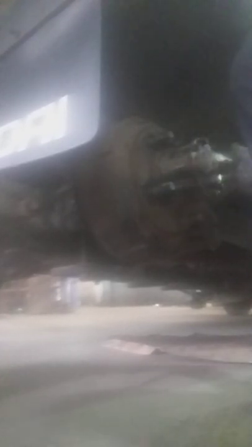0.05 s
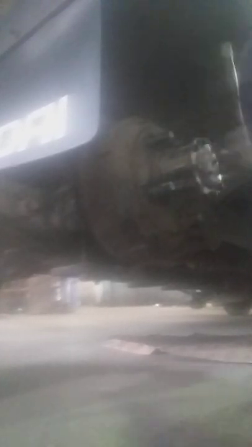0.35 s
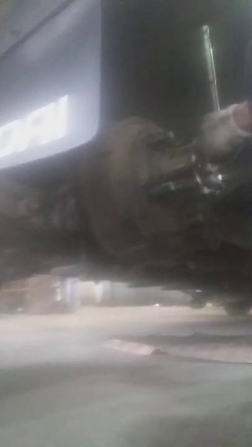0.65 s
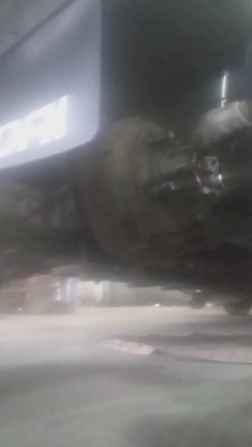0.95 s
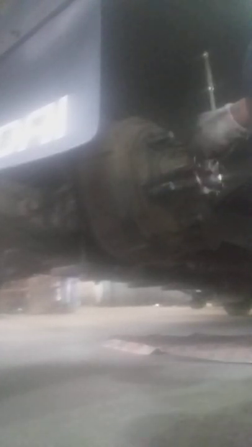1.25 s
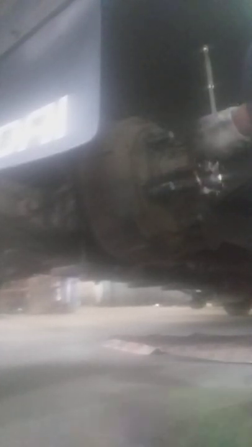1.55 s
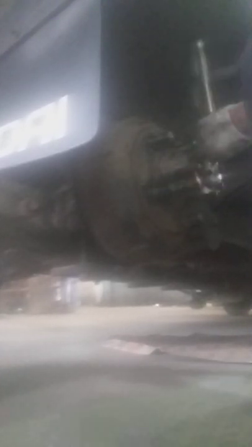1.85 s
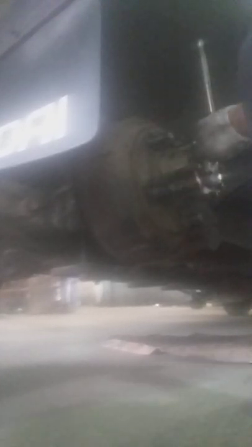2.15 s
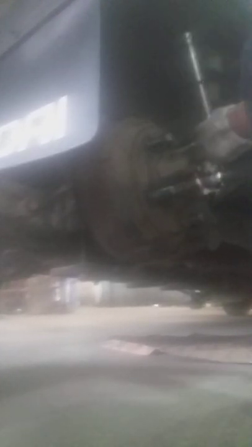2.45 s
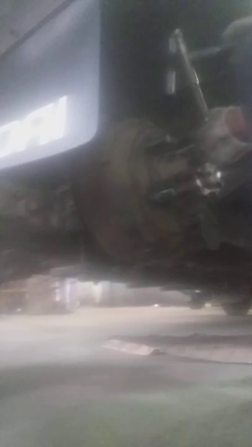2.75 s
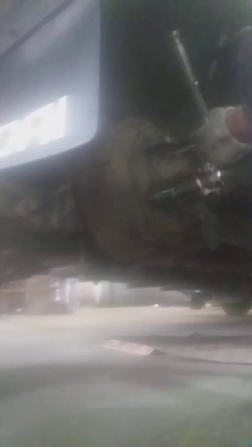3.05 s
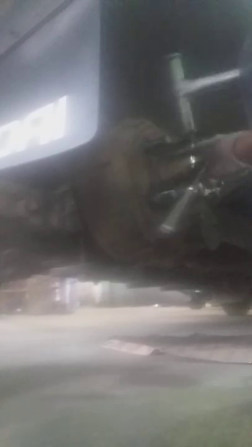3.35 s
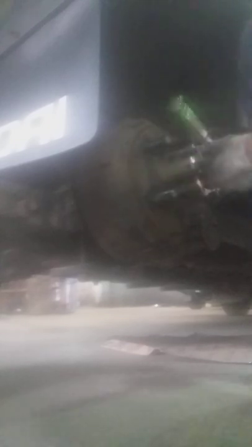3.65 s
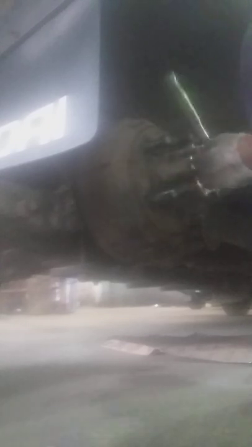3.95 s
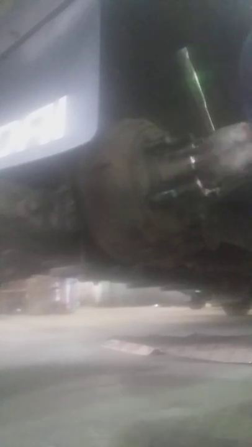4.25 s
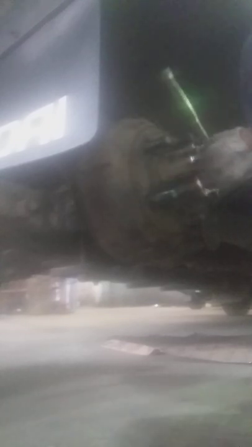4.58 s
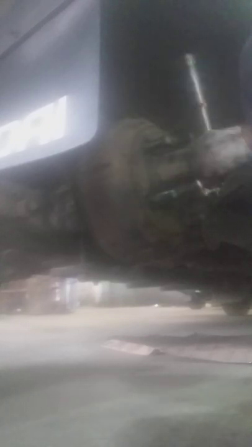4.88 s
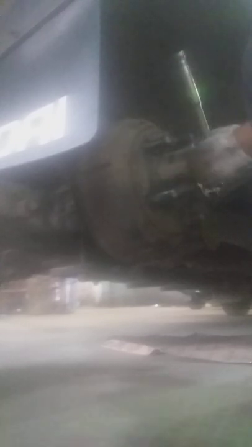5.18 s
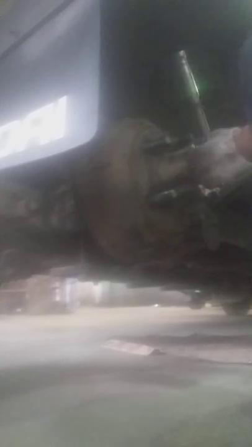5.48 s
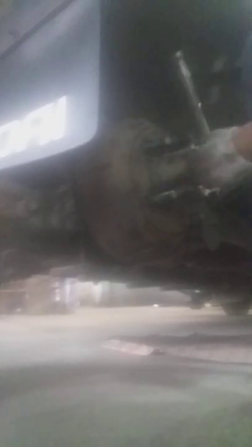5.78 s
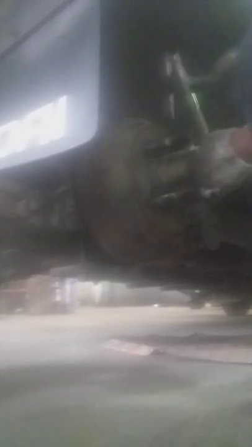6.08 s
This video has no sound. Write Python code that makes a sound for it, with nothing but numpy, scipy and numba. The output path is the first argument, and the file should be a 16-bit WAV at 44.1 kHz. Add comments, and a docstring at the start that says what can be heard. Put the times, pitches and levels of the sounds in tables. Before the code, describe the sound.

A hammer strikes steel four times, pauses for small metal clinks, then strikes twice more, over a workshop's fan and motor hum.

```python
"""A reverberant workshop, with a phone microphone close to a wheel hub.
Six hard hammer blows land on a steel drift held against the hub: the steel rings, the suspension thuds.
The drift clinks as it is set in place; further off an electric motor whines and a fan rushes.
Each blow overloads the phone, whose gain control sinks, holds, and lets the shop swell back in the
pauses."""
import sys
import numpy as np
from scipy import signal
from scipy.fft import rfft, irfft
from scipy.io import wavfile
from scipy.ndimage import uniform_filter1d
from numba import njit

SR = 44100
rng = np.random.default_rng(int(sys.argv[2]) if len(sys.argv) > 2 else 0)


def inscribe(sig):
    """Save sig as 16-bit PCM at rate SR to the path in sys.argv[1].

    A 1-D sig is mono; a 2-D sig holds one channel per row.
    Samples are clipped to [-1, 1] before scaling.
    """
    pcm = np.round(np.clip(np.atleast_2d(sig).T, -1, 1) * 32767)
    wavfile.write(sys.argv[1], SR, pcm.astype(np.int16))


N = 274302
TIME = np.arange(N) / SR
AGE = np.arange(SR) / SR  # the second after a contact


def undb(db):
    """Decibels to gain."""
    return 10 ** (np.asarray(db) / 20)


def add(track, s, sound):
    """Mix a sound into a track at time s."""
    i = int(s * SR)
    track[i:i + len(sound)] += sound[:N - i]


def noise(spectrum, size, tilt_db=0):
    """Noise of rms 1 with a (f/Hz, level/dB) spectrum, tilted in dB per octave."""
    octave = np.log2(np.fft.rfftfreq(size, 1 / SR) + 1)
    hz, db = np.transpose(spectrum)
    gain = undb(np.interp(octave, np.log2(hz), db, left=-np.inf) + tilt_db * octave)
    x = irfft(rfft(rng.standard_normal(size)) * gain, size)
    return x / np.sqrt(np.mean(x ** 2))


def walk(rate):
    """Smooth random wander with a spread near 1, at rate steps a second."""
    k = int(SR / rate)
    steps = np.repeat(rng.standard_normal(N // k + 1), k)
    return 1.09 * uniform_filter1d(uniform_filter1d(steps, k), k)[:N]


def fade(t60):
    """Exponential decay, 60 dB down after t60 seconds."""
    return undb(-60 * AGE / max(t60, .005))


def ring(modes, smear_hz, tilt_db=0):
    """Decaying modes from rms 1; each contact excites them anew and chattering joints smear the pitch."""
    out, power = 0, 0
    for (hz, db, t60), (scatter, start) in zip(modes, rng.standard_normal((len(modes), 2))):
        gain = undb(db + 2 * scatter + tilt_db * np.log2(hz))
        chatter = np.cumsum(rng.standard_normal(SR)) * np.sqrt(2 * np.pi * smear_hz / SR)
        phase = 2 * np.pi * (hz * AGE + start) + uniform_filter1d(chatter, size=100)
        out = out + gain * fade(t60) * np.sin(phase)
        power += gain ** 2 / 2
    return out / np.sqrt(power)


# faint hiss at the very back: f/Hz, level/dB
HISS = [(9000, -15), (10300, -3), (11200, -16), (12300, 4.5), (12900, -13), (13700, -5), (14200, -9),
        (14700, -3.5), (15700, -14.5)]
# its course: t/s, level/dB
HISS_LEVEL = [(0, -58), (4.9, -67), (5.05, -52.5), (6.2, -54)]

def hiss():
    """A thin, high, flickering hiss, stronger towards the end."""
    return undb(np.interp(TIME, *np.transpose(HISS_LEVEL)) + 1.8 * walk(40)) * noise(HISS, N)


# fan and shop air, well off the microphone: f/Hz, level/dB
FAN_AIR = [(25, -19), (60, -10.5), (110, 0.5), (500, -6), (1000, -8.5), (2000, -14), (2450, -19.5),
           (2950, -4), (3400, -15), (4150, -12), (6800, -20), (8700, -28), (12300, -31.5), (16000, -35.5)]
# the fan's drone: f/Hz, level/dB
FAN_DRONE = [(55, -35.0), (70, -7.5), (77, 1.5), (84, -9), (105, -40.0), (400, -91.5)]

def fan():
    """A steady rush of air over a throbbing low drone."""
    rush = undb(-37.5 + 0.45 * walk(3.2)) * noise(FAN_AIR, N)
    drone = undb(-46) * noise(FAN_DRONE, N)
    return rush + drone


def shaft_tones(lines, turns, waver_db, waver_rate):
    """Tones on multiples of the shaft rate, wavering in level and phase on their way through the hall."""
    out = 0
    for multiple, db in lines:
        phase = 2 * np.pi * (multiple * turns + rng.random()) + .5 * walk(waver_rate)
        out = out + undb(db + waver_db * walk(waver_rate)) * np.sqrt(2) * np.sin(phase)
    return out


# motor hum and faint overtones, across the hall: multiple of the shaft rate, level/dB
MOTOR_HUM = [(2, -48), (4, -49), (35, -64), (72, -59), (75, -58), (95, -48), (96, -55), (101, -56),
             (155, -67), (164, -70), (167, -70)]
# rotor slot whine: multiple of the shaft rate, level/dB
ROTOR_SLOTS = [(45, -62), (48, -41), (49, -53), (51, -54), (52, -39), (53, -54)]
# swell of that whine at the microphone: t/s, level/dB
WHINE_SWELL = [(0, -19), (.85, -3.5), (1.1, -1.5), (1.22, 5), (1.35, -2), (1.48, 7.5), (1.7, -2.5),
               (4.3, -4.5), (4.53, -1), (4.75, -7), (5.3, -10.5), (6.2, -1)]

def motor(shaft_hz=59.01):
    """A distant induction motor: low hum, fluttering overtones and a slot whine that swells and fades."""
    turns = np.cumsum(shaft_hz * (1 + 0.0003 * walk(7.7) + 0.0015 * walk(60))) / SR
    whine = shaft_tones(ROTOR_SLOTS, turns, waver_db=1.8, waver_rate=26)
    hum = shaft_tones(MOTOR_HUM, turns, waver_db=2.6, waver_rate=32)
    return undb(np.interp(TIME, *np.transpose(WHINE_SWELL))) * whine + hum


# decay of the hall around the microphone: f/Hz, t60/s
HALL_DECAY = [(100, 0.87), (1000, 0.77), (2900, 1.325), (4100, 0.92), (6000, 0.55), (7200, 0.68),
              (12000, 0.38)]

def workshop(x):
    """Diffuse reverberation of the hall; the high treble dies first."""
    hz, t60 = np.transpose(HALL_DECAY)
    spectrum = rfft(rng.standard_normal(SR))
    f = np.fft.rfftfreq(SR, 1 / SR) + 1
    band = np.round(2 * np.log2(np.maximum(f, hz[0])))  # half octaves
    tail = 0
    for b in np.unique(band):
        band_t60 = np.interp(b / 2, np.log2(hz), t60)
        tail = tail + irfft(spectrum * (band == b), SR) * fade(band_t60)
    tail = tail * (1 - fade(t60=0.05))  # reflections build up
    return signal.fftconvolve(x, tail / np.sqrt(np.sum(tail ** 2)))[:N]


def between(slide, knock, sharpness):
    """Geometric blend of two times."""
    return slide ** (1 - sharpness) * knock ** sharpness


# the drift touching the hub, close by: t/s, level/dB, sharpness (0 sliding, 1 knocking)
DRIFT_TOUCHES = [(0.523, -30, 0.39), (0.5493, -24.5, 0.42), (0.8526, -33.5, 0.52), (1.0016, -36, 0.66),
                 (3.9251, -28, 0.16), (4.671, -33.5, 0.055), (4.837, -24.5, 0.66), (4.873, -17.5, 0.91),
                 (4.9164, -21.5, 0.8)]
# modes of the loose drift: f/Hz, level/dB, t60/s
LOOSE_DRIFT_MODES = [(2050, 6, 0.094), (3920, 7, 0.069), (4150, 11, 0.055), (4770, 4.5, 0.11),
                     (5520, 11, 0.036), (6020, 14.5, 0.085), (6100, 10, 0.044), (8440, 6, 0.058),
                     (11000, 1, 0.048)]
# steel scraping on steel: f/Hz, level/dB
STEEL_SCRAPE = [(200, -27), (1200, -4), (2100, -3), (4300, -1.5), (6400, 2.5), (7800, -14.5), (11000, -16),
                (16000, -10)]

def touches(slide_tilt_db=-6.5, knock_tilt_db=3.1):
    """The loosely held drift finds its seat: slides are slow and dull, knocks quick and bright."""
    out = np.zeros(N)
    for s, db, sharpness in DRIFT_TOUCHES:
        tilt_db = slide_tilt_db + sharpness * (knock_tilt_db - slide_tilt_db)
        scrape = noise(STEEL_SCRAPE, SR, tilt_db) * fade(t60=between(0.16, 0.059, sharpness))
        clink = undb(-1.0) * ring(LOOSE_DRIFT_MODES, smear_hz=50, tilt_db=tilt_db)
        rise_s = between(.005, .0003, sharpness)
        add(out, s, undb(db) * (scrape + clink) * (1 - np.exp(-AGE / rise_s)))
    return out


# the crowd of short modes in hub, brake and axle: f/Hz, level/dB
AXLE_CLASH = [(60, -24), (250, -17), (720, -7.5), (1050, -12.5), (1600, -18.5), (2000, -11), (2450, -14),
              (2850, 9.5), (3400, -2), (5200, -1.5), (7100, -0.5), (7900, -20.5), (9200, -23.5),
              (12000, -20), (16000, -26.5)]
# modes of the wheel hub, right at the microphone: f/Hz, level/dB, t60/s
HUB_MODES = [(2753, -3, .2), (2831, -2, .28), (2878, -5, .24), (2985, -4, .2), (3066, -3, .22),
             (3171, -10, .15), (3402, -14, .12), (3570, -15, .12), (3720, -9, .14), (3890, -8, .15),
             (3981, -7, .15), (4119, -5, .16), (4293, -8, .14), (4575, -8, .15), (4727, -4, .15),
             (5043, -10, .14), (5464, -10, .13), (5725, -7, .13), (5871, -9, .13), (6380, -7, .13),
             (6480, -6, .13), (7150, -12, .13), (11750, -17, .1), (12130, -19, .12)]
# modes of the struck drift: f/Hz, level/dB, t60/s
STRUCK_DRIFT_MODES = [(5228, 0, .14), (5205, -7, .1)]

def steel_ring(t60, tilt_db, hub_db, drift_db):
    """One contact of steel on steel: a dense clash, and the ring of hub and drift."""
    clash = noise(AXLE_CLASH, SR, tilt_db) * fade(t60)
    hub = undb(hub_db) * ring(HUB_MODES, smear_hz=22, tilt_db=tilt_db)
    drift = undb(drift_db) * ring(STRUCK_DRIFT_MODES, smear_hz=38)
    return clash + hub + drift


# thud of suspension and body, just behind the hub: f/Hz, level/dB
BODY_THUD = [(25, -26.5), (70, -6), (130, -1), (240, -10), (500, -22.5), (1000, -11), (2000, -17.5),
             (6000, -91)]
# modes of suspension arm and wheel arch: f/Hz, level/dB, t60/s
BODY_MODES = [(234.6, -0.5, 0.6), (342.4, 0, 0.21), (474.6, 1, 0.32), (695, -2.5, 0.227), (807, -10, 0.63),
              (962, 3, 0.26), (1095, -0.5, 0.36)]

def suspension():
    """A blow builds up in the suspension as a low thud with a hollow ring."""
    thud = noise(BODY_THUD, SR) * fade(t60=0.16)
    hollow = undb(-9.5) * ring(BODY_MODES, smear_hz=22)
    return (thud + hollow) * (1 - fade(t60=0.0068))


# steel meeting steel, close up: f/Hz, level/dB
STEEL_CRACK = [(40, -5), (200, -0.5), (1000, 1), (2200, -4.5), (3000, 5.5), (6500, 3.5), (8000, -16),
               (16000, -12)]

def crack(envelope, tilt_db=0):
    """The broadband burst at the instant of contact."""
    return noise(STEEL_CRACK, SR, tilt_db) * envelope


# the drift jumps off its seat and rattles on the hub after the fourth blow: t/s, level/dB
DRIFT_REBOUNDS = [(3.1641, 7), (3.1849, 4), (3.1995, 3.5), (3.211, 1.5)]

def rebounds():
    """The bouncing drift ticks and briefly rings the steel; it is too light to shake the suspension."""
    out = np.zeros(N)
    for s, db in DRIFT_REBOUNDS:
        tick = undb(-6.5) * crack(fade(t60=.014), tilt_db=5.5)
        steel = steel_ring(t60=0.048, tilt_db=2, hub_db=-6, drift_db=-1.5) * fade(t60=.2)
        add(out, s, undb(db) * (tick + steel))
    return out


# hammer blows, close to the microphone:
# t/s, level/dB, clash t60/s, hardness as tilt/(dB per octave), hub level/dB, drift level/dB
HAMMER_BLOWS = [(1.7044, 10.5, 0.18, -3.5, 3, -0.5), (2.2266, 15, 0.14, 0.5, -4.5, -2),
                (2.716, 13, 0.11, -0.5, -2, -9.5), (3.143, 12.5, 0.075, 0.5, -2, -2.5),
                (5.557, 13.5, .16, -0.5, -9, -4), (6.0563, 17, 0.12, 3.5, -7, -35)]

def hammer(full_push_t60=0.12):
    """Each blow cracks, rings and thuds; harder ones crack shorter, ring brighter and push more."""
    out = np.zeros(N)
    for s, db, t60, hardness, hub_db, drift_db in HAMMER_BLOWS:
        crack_s = 0.0085 * np.exp(-0.068 * hardness)
        impact = undb(1.5) * crack(np.exp(-(AGE / crack_s) ** 4))
        push = undb(-18 + hardness) * t60 / full_push_t60  # a short, glancing clash pushes less
        thud = push * suspension()
        steel = steel_ring(t60, hardness, hub_db, drift_db)
        add(out, s, undb(db) * (impact + steel + thud))
    return out


def scene():
    """Hammering and handling close by, the hall and its machines behind."""
    steel = hammer() + rebounds() + touches()
    return (steel + undb(-22) * workshop(steel) + motor() + fan() + hiss())[None]


@njit
def gain_control(x, trigger, hold_s, first_hold_s, depth_db, fall_db_per_s, rise_db_per_s):
    """Gain in dB, starting low: a loud peak makes it sink and stay down, then it climbs back."""
    out, db, timer = np.empty(len(x)), -depth_db, first_hold_s
    for i in range(len(x)):
        timer = hold_s if abs(x[i]) > trigger else timer - 1 / SR
        if timer > 0:
            db = max(db - fall_db_per_s / SR, -depth_db)
        else:
            db = min(db + rise_db_per_s / SR, 0.)
        out[i] = db
    return out


@njit
def limiter(x, top, attack_s, release_s):
    """Follows the peaks 3 ms ahead and holds them near the top."""
    out, env, ahead = np.empty(len(x)), 0., int(.003 * SR)
    for i in range(len(x)):
        size = abs(x[min(i + ahead, len(x) - 1)])
        env += (size - env) / (SR * (attack_s if size > env else release_s))
        out[i] = x[i] * min(1., top / (env + 1e-9))
    return out


def record(dry):
    """The microphone overloads and colours the sound; the phone rides its gain, limits, cuts the top."""
    overload, top_hz = undb(16.0), 15800
    dip_hz, dip_q, dip_db = 8900, 3.2, -10  # the microphone's dull spot
    x = overload * np.tanh(dry[0] / overload)
    x = x - (1 - undb(dip_db)) * signal.lfilter(*signal.iirpeak(dip_hz, dip_q, fs=SR), x)
    x = signal.sosfilt(signal.butter(3, 48, "highpass", fs=SR, output="sos"), x)
    x = x * undb(gain_control(x, trigger=2.0, hold_s=1.024, first_hold_s=0.62,
                              depth_db=18.0, fall_db_per_s=34.0, rise_db_per_s=52.0))
    x = limiter(x, top=0.55, attack_s=0.0032, release_s=0.021)
    x = x / (1 + x ** 8) ** (1 / 8)  # soft clip at full scale
    return signal.sosfilt(signal.ellip(10, .2, 90, top_hz, fs=SR, output="sos"), x)[None]


dry = scene()
out = record(dry)
inscribe(out)
```